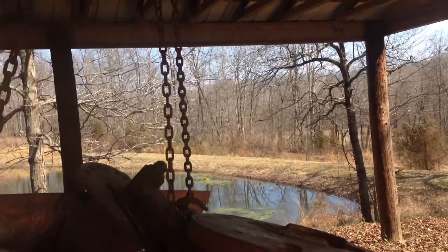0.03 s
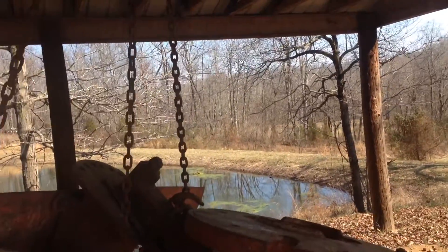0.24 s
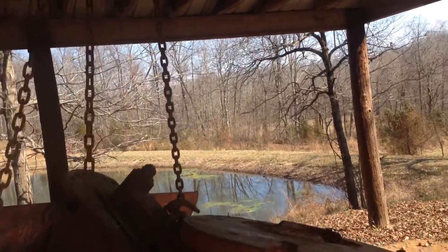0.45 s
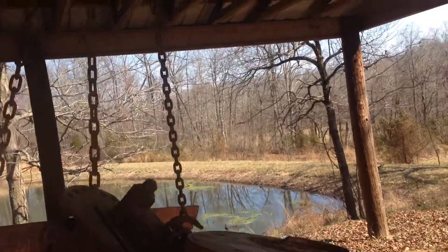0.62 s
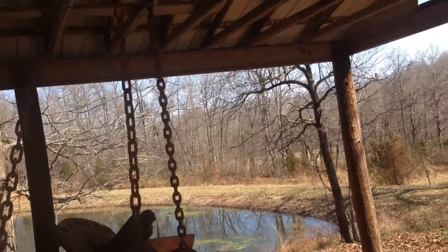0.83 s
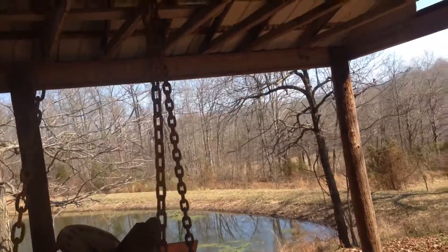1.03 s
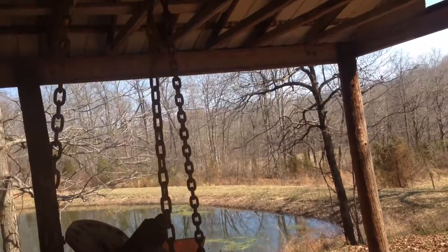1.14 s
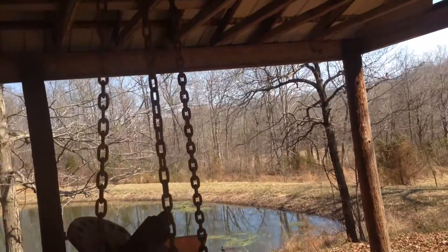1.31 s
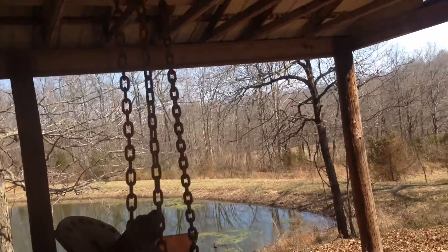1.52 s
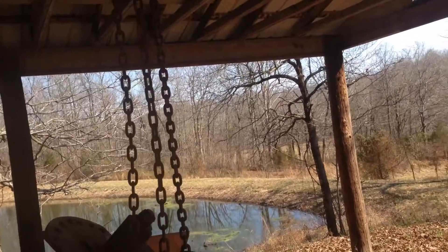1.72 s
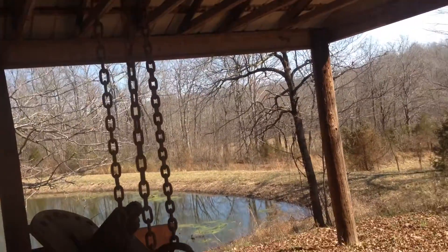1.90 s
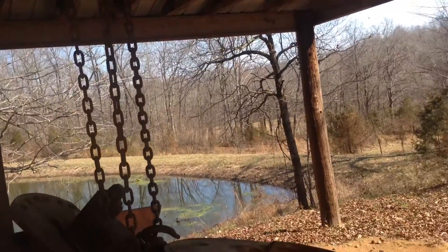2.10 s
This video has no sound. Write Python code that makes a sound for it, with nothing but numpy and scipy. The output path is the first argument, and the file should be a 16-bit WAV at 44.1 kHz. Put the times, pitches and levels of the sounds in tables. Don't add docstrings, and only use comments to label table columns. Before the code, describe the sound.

Rapid bright pawl clicks and dull frame knocks from a hand winch, followed by sparse chain clinks

```python
import sys
import numpy as np
from scipy import signal
from scipy.fft import rfft, irfft
from scipy.io import wavfile
from scipy.ndimage import uniform_filter1d

SR = 44100
rng = np.random.default_rng(int(sys.argv[2]) if len(sys.argv) > 2 else 0)


def to_linear_factor(level_db):
    exponent = np.asarray(level_db, float) / 20
    return 10 ** exponent


def int16_out(signal):
    q = np.round(np.clip(np.atleast_2d(signal).T, -1, 1) * 32767)
    wavfile.write(sys.argv[1], SR, q.astype(np.int16))


N = 94815

# middle_s, peak_db, pitch_hz
BUMPS = [
    (.0002, -20, 108),
    (0.249, -26, 87),
    (0.297, -20, 130),
    (0.38, -25, 79.6),
    (0.9627, -13.5, 344),
    (0.965, -21, 104),
]
# time_s, rumble_level_db
SHAKE = [(0, -33), (.03, -58.5), (.2, -72), (.25, -37), (.5, -38.5), (.6, -35.5), (.75, -36), (.95, -34.5),
         (1.02, -42), (1.3, -46.5), (1.5, -58.5), (1.7, -59.5), (2.15, -62)]
# frequency_hz, density_db
RUMBLE = [(40, -32), (90, -10), (130, -2), (180, -3.5), (260, -12), (400, -18.5), (700, -32.5),
          (1200, -56.5)]
# frequency_hz, density_db
AIR = [(20, -28.5), (45, -6.5), (65, -1), (90, -3), (140, -22), (300, -55.5)]
# time_s, level_db
AIR_LEVEL = [(0, -64), (.2, -55.5), (.26, -37), (.5, -46.5), (1.0, -46), (1.55, -50), (1.65, -68),
             (1.85, -55), (2.15, -56)]
# frequency_hz, density_db
YARD = [(240, -11.5), (400, -7.5), (600, 10.5), (953, 3), (3420, 5), (13500, 1), (15200, -5.5)]
# start_s, peak_db, tilt_db_per_octave, favoured_hz
SCRAPES = [(0.017, -48, -4, 3940), (0.213, -34.5, -0.5, 3417), (0.238, -16.5, 7.5, 3430),
           (.283, -32, -7, 3430), (.314, -32, -0.5, 3430), (0.337, -15.5, -3, 3393), (.37, -27.5, 2, 3914),
           (.385, -26.5, 2.5, 3878), (0.397, -15.5, 7, 6700), (0.439, -21.5, 6.5, 3560),
           (0.46, -10, 2, 4485), (0.494, -17.5, 0, 3560), (.508, -17, 5, 6715), (0.554, -19.5, -0.5, 3914),
           (0.602, -26, -1, 3940), (0.645, -23, -4.5, 3560), (0.858, -19.5, -7.5, 4485),
           (0.933, -28, -9.5, 3430), (0.964, -27.5, 1, 3940), (1.054, -27.5, -8.5, 3500),
           (1.066, -37, -7, 4485), (1.098, -47, -6, 3500)]
# start_s, peak_db, chatter_s, tilt_db_per_octave, favoured_hz
TEETH = [(0.0405, -36, 0.0031, -14, 3940), (0.349, -8, 0.0018, -2, 3700), (.355, -16, 0.0039, -1.5, 4485),
         (0.4155, -4, 0.0016, 0.8, 3730), (0.4246, -14.5, 0.0022, 1.5, 3940), (0.467, -9, .004, 0.8, 3940),
         (0.5231, -5, 0.003, 2, 3940), (0.5744, -15.5, 0.003, 1, 3940), (.582, -12, 0.0017, 0.5, 3940),
         (0.590, -5, 0.0026, 0, 3940), (0.669, -10.5, 0.0031, 2.5, 7970),
         (0.6884, -11.5, 0.0034, 4.5, 3650), (0.764, -21.5, 0.012, 0.6, 3550),
         (0.8807, -21, 0.0028, -4, 3450), (0.892, -27, 0.0061, 0, 3940), (0.9535, -22, 0.0033, 1, 7970),
         (1.082, -30.5, 0.0029, -17, 3430), (1.171, -37, .0025, -15, 2780)]
# pitch_hz, width_hz, level_db
PAWL_MODES = [(2780, 55, -13), (3430, 45, -4), (3560, 55, -5), (3940, 70, 0), (4485, 45, -1),
              (5190, 70, -10), (5880, 45, -13), (6300, 55, -13), (6715, 50, -2), (7150, 45, -10),
              (7970, 55, -3), (9490, 80, -11), (10700, 130, -12), (12200, 120, -14)]
# time_s, rattle_level_db
DRUM_RUN = [(0, -55), (.1, -78), (.2, -62), (.25, -37), (.32, -38.5), (.36, -28.5), (.6, -31), (.7, -39.5),
            (.75, -43), (.8, -35), (1.0, -45), (1.04, -47.5), (1.1, -56), (1.22, -72), (1.4, -74)]
# start_s, peak_db, chatter_s, tilt_db_per_octave, favoured_hz
KNOCKS = [(.242, -12, 0.0043, 8.5, 1710), (.246, -21, 0.02, 5.5, 2340), (.254, -17.5, .014, -5.5, 754),
          (.35, -21, 0.036, -2.5, 1037), (.367, -19, 0.033, -4, 1034), (.431, -16.5, 0.023, -10.5, 1163),
          (.545, -15.5, 0.036, -5, 1037), (.579, -13, 0.0075, -5.5, 410), (.64, -30, 0.011, -11, 370),
          (.784, -3, 0.004, 5, 1746), (.786, -9, 0.0019, 5.5, 2430), (.789, -13, .005, 6, 2920),
          (.796, -13, 0.0027, -5.5, 1812), (.801, -9, 0.0059, -4.5, 1163), (.808, -12, 0.0062, 5, 1146),
          (.819, -20, .02, -9.5, 924), (1.084, -34.5, .004, 21, 1800), (1.124, -46, .01, -15, 754)]
# pitch_hz, width_hz, level_db
FRAME_MODES = [(320, 50, -4), (410, 40, -3), (519, 30, -3), (637, 30, -4), (754, 30, -5), (924, 40, -6),
               (1037, 35, -2), (1163, 40, -1), (1340, 70, -8), (1680, 70, -5), (1812, 70, -5),
               (2430, 150, -5), (2920, 85, -5), (3500, 250, -9)]
# frequency_hz, density_db
FRAME_CRASH = [(300, -2), (1000, 1), (2500, 2.5), (5000, -12), (15000, -30)]
# start_s, peak_db
TICKS = [(.243, -24.5), (0.2644, -19.5), (0.282, -25), (0.3669, -19.5), (.5055, -18.5), (1.4536, -40.5),
         (1.5811, -40), (1.9843, -34.5), (1.999, -36), (2.0028, -33.5), (2.0178, -40.5)]
# start_s, peak_db, chatter_s, tilt_db_per_octave, favoured_hz
CLINKS = [
    (1.375, -60.5, 0.01, -1.5, 1600),
    (1.705, -50.5, .008, 0, 3970),
    (1.723, -16.5, 0.004, 6, 3970),
    (1.748, -24.5, 0.0028, 1.5, 2600),
    (1.76, -43, .015, -12.5, 1020),
    (1.83, -51.5, 0.0017, 7, 5400),
    (1.915, -53, 0.064, -7.5, 1600),
    (1.953, -45, 0.011, -17, 1020),
    (2.017, -31, 0.007, -1, 2480),
    (2.026, -34.5, 0.005, -3.5, 1400),
]
# pitch_hz, width_hz, level_db
CHAIN_MODES = [(1020, 63, -16.5), (1224, 50, -10), (1378, 50, -14.5), (1600, 45, -4.5), (1700, 39, -13),
               (1982, 38, -15), (2493, 100, -2), (2613, 130, 1.5), (2846, 160, -6.5), (3630, 280, -10.5),
               (3970, 78, -8.5), (4605, 24, -6.5), (5400, 100, -8), (7040, 760, -12)]

YARD_DB, PAWL_DB, FRAME_DB, CHAIN_DB, TICK_DB = -65.5, -0.5, -1.5, -0.5, 1.5
RATTLE_DB, RATTLE_FRAME_DB, GRIT_DB = -3, -7.5, -19.5
RATTLE_PER_S, RATTLE_PATCHY_DB = 1200, 3
SCRAPE_S = 0.0083
SPIKY_DB = 3.5
FAVOUR_DB, FAVOUR_OCTAVES = 8.5, 0.056
SHED_T60_S, SHED_TREBLE_LOSS, SHED_DB = 0.24, 0.53, -9
POST_S, POST_DB, POST_HZ, POST_WIDTH_HZ = 2.022, -42, 495, 20


def tint(x, points, unit=False, tilt_db=0):
    hz, db = np.array(points, float).T
    f = np.maximum(np.fft.rfftfreq(len(x), 1 / SR), 1)
    gain_db = np.interp(np.log(f), np.log(hz), db)
    gain_db = gain_db + tilt_db * np.log2(np.clip(f, 700, 9000) / 2500)
    y = irfft(rfft(x) * to_linear_factor(gain_db), len(x))
    return y / np.std(y) if unit else y


def noise(points):
    return tint(rng.standard_normal(N), points, True)


def curve(table):
    time_s, level_db = np.array(table, float).T
    return to_linear_factor(np.interp(np.arange(N) / SR, time_s, level_db))


def walk(rate_hz):
    hold = int(SR / rate_hz)
    steps = np.repeat(rng.standard_normal(N // hold + 1), hold)
    smooth = uniform_filter1d(steps, hold)[:N]
    return smooth / np.std(smooth)


def highpass(x, order, hz):
    return signal.sosfilt(signal.butter(order, hz, "high", fs=SR, output="sos"), x)


def bumps():
    t = np.arange(N) / SR
    out = np.zeros(N)
    for start_s, peak_db, hz in BUMPS:
        since = t - start_s
        decay = hz * np.where(since > 0, 1.9, 2.1)
        fade = np.exp(-np.hypot(since, .0006) * decay)
        out += to_linear_factor(peak_db) * np.cos(2 * np.pi * hz * since) * fade
    return out


def rumble():
    return noise(RUMBLE) * curve(SHAKE) * to_linear_factor(2.6 * walk(12))


def air():
    return noise(AIR) * curve(AIR_LEVEL)


def yard():
    return to_linear_factor(YARD_DB) * noise(YARD)


def ring(x, hz, width_hz):
    pole = np.exp((2j * np.pi * hz - np.pi * max(width_hz, 5)) / SR)
    return signal.lfilter([1], [1, -pole], x).imag


def strike(events, modes, crash_colour, scatter_db, widen, crash_db, swell, detune):
    size = 6000
    mode_hz, width_hz, mode_db = np.array(modes, float).T
    t = np.arange(size) / SR
    out = np.zeros(N + size)
    for start_s, peak_db, chatter_s, tilt, favoured_hz in events:
        shape = (1 - np.exp(-t / (swell * chatter_s))) * np.exp(-t / chatter_s)
        contacts = rng.standard_normal(size)
        push = np.sign(contacts) * to_linear_factor(SPIKY_DB * np.abs(contacts)) * shape
        db = mode_db + scatter_db * rng.standard_normal(len(mode_hz))
        db = db + tilt * np.log2(np.maximum(mode_hz, 1100) / 2500)
        octaves_off = np.log2(mode_hz / favoured_hz)
        db = db + FAVOUR_DB * np.exp(-(octaves_off / FAVOUR_OCTAVES) ** 2)
        pitches = mode_hz * (1 + detune * rng.standard_normal(len(mode_hz)))
        ringing = np.zeros(size)
        for hz, width, level in zip(pitches, width_hz, db):
            mode = ring(push, hz, width * widen)
            ringing += to_linear_factor(level) * mode / np.std(mode)
        crash = tint(rng.standard_normal(size), crash_colour, True, tilt) * shape / np.max(shape)
        i = int(start_s * SR)
        out[i:i + size] += to_linear_factor(peak_db) * (ringing / np.max(np.abs(ringing)) + to_linear_factor(crash_db) * crash)
    return out[:N]


def pawl():
    scrapes = [(s, db, SCRAPE_S, tilt, hz) for s, db, tilt, hz in SCRAPES]
    crash_colour = [(1500, -25.5), (3500, 4.1), (8000, -3.5), (15000, -12)]
    blows = strike([*TEETH, *scrapes], PAWL_MODES, crash_colour,
                   scatter_db=0.54, widen=1.4, crash_db=-17.5, swell=1.2, detune=0.0024)
    return highpass(to_linear_factor(PAWL_DB) * blows, 2, 2700)


def rattle(modes, widen):
    struck = rng.random(N) < RATTLE_PER_S / SR
    hits = struck * rng.standard_normal(N) * to_linear_factor(RATTLE_PATCHY_DB * walk(60))
    y = np.zeros(N)
    for hz, width, db in modes:
        uneven = hits * to_linear_factor(9.0 * walk(30))
        y += to_linear_factor(db) * np.sqrt(width) * ring(uneven, hz, width * widen)
    return y / np.std(y) * curve(DRUM_RUN)


def grit():
    grains = rng.standard_normal(N) * to_linear_factor(4.3 * walk(210))
    bright = tint(grains, [(3000, -21), (8000, 0.0), (15000, -14.0)], True)
    return to_linear_factor(GRIT_DB) * bright * curve(DRUM_RUN)


def shed(x):
    size = 12000
    t = np.arange(size) / SR
    tail = np.zeros(size)
    for hz in 250 * 2. ** np.arange(6):
        octave = signal.butter(2, [hz, 2 * hz], "band", fs=SR, output="sos")
        band = signal.sosfilt(octave, rng.standard_normal(size))
        loss = max(hz / 1000, 1) ** SHED_TREBLE_LOSS
        tail += band * np.exp(-np.log(1000) * t / SHED_T60_S * loss) * (t > .003)
    return to_linear_factor(SHED_DB) * signal.fftconvolve(x, tail / np.sqrt(np.sum(tail ** 2)))[:N]


def frame():
    return to_linear_factor(FRAME_DB) * strike(KNOCKS, FRAME_MODES, FRAME_CRASH,
                                  scatter_db=1.96, widen=1.2, crash_db=-12.5, swell=.08, detune=.002)


def ticks():
    size = 600
    fade = np.exp(-np.arange(size) / SR / 0.00084)
    out = np.zeros(N + size)
    for start_s, peak_db in TICKS:
        i = int(start_s * SR)
        out[i:i + size] += to_linear_factor(peak_db + TICK_DB) * rng.standard_normal(size) * fade / 2
    return highpass(out[:N], 2, 4200)


def chain():
    crash_colour = [(900, -31), (1300, -4.0), (4000, 5.5), (12000, -7.5)]
    clinks = strike(CLINKS, CHAIN_MODES, crash_colour,
                    scatter_db=0.77, widen=0.78, crash_db=-9, swell=0.22, detune=0.0069)
    return highpass(to_linear_factor(CHAIN_DB) * clinks, 6, 900)


def post():
    t = np.maximum(np.arange(N) / SR - POST_S, 0)
    return to_linear_factor(POST_DB) * np.sin(2 * np.pi * POST_HZ * t) * np.exp(-np.pi * POST_WIDTH_HZ * t)


def scene():
    background = bumps() + rumble() + air() + yard()
    loose = to_linear_factor(RATTLE_DB) * rattle(PAWL_MODES, 0.66) + to_linear_factor(RATTLE_FRAME_DB) * rattle(FRAME_MODES, 2.0)
    ringing = pawl() + loose + frame() + chain() + post()
    ringing = tint(ringing, [(200, -10.5), (500, 1.45), (6000, 0.75), (15000, -15.5)])
    metal = ringing + grit() + ticks()
    return (metal + shed(metal) + background)[None]


def band_limit(x):
    return signal.sosfilt(signal.butter(12, 15360, fs=SR, output="sos"), x)


def record(dry):
    return band_limit(dry)


dry = scene()
out = record(dry)
int16_out(out)
```